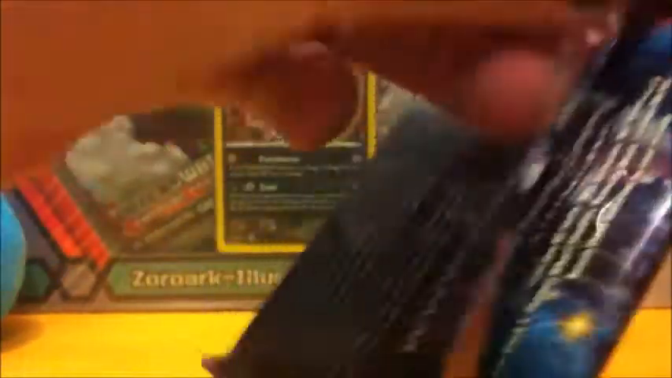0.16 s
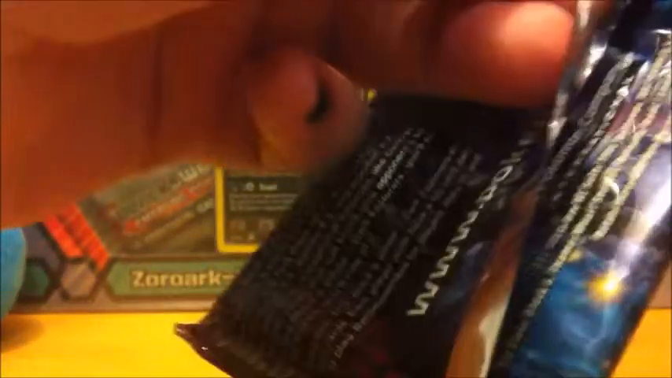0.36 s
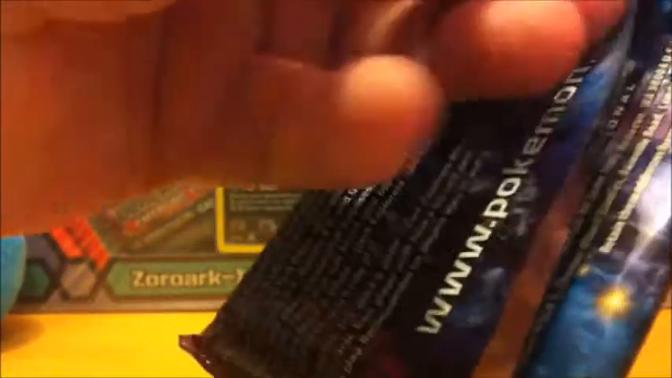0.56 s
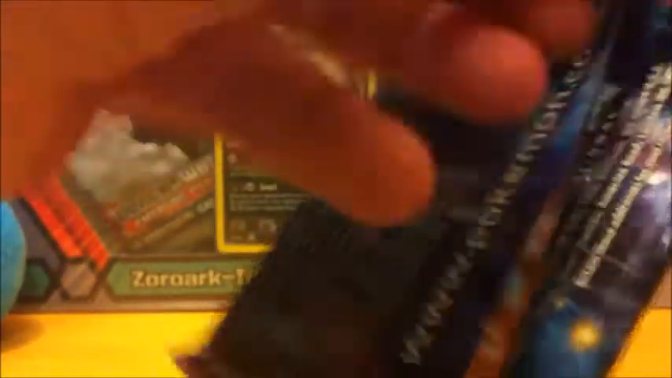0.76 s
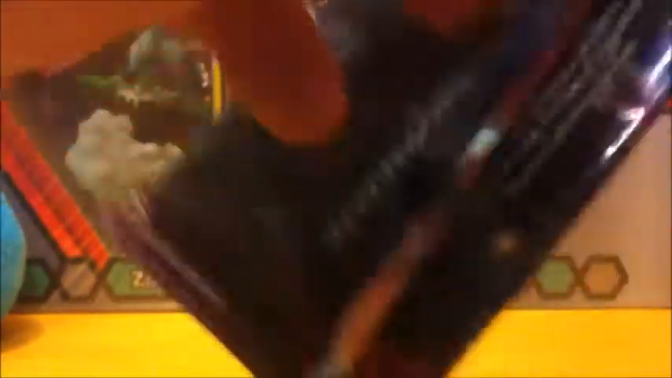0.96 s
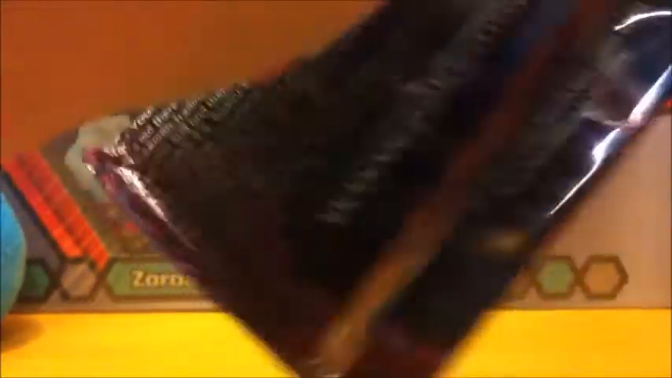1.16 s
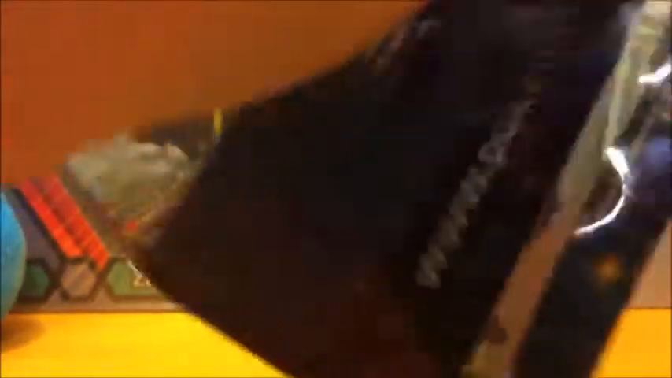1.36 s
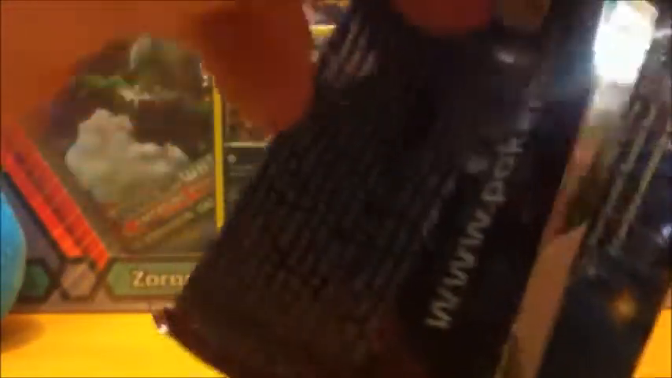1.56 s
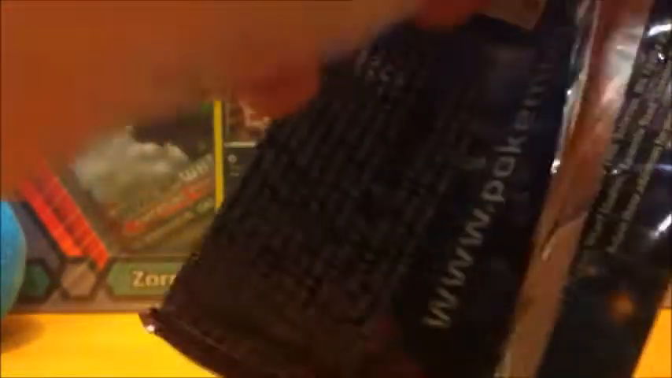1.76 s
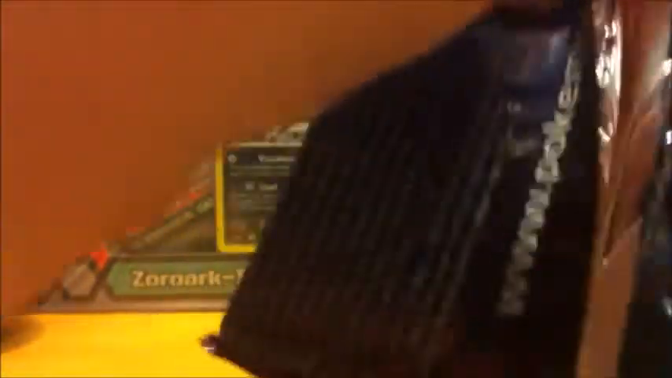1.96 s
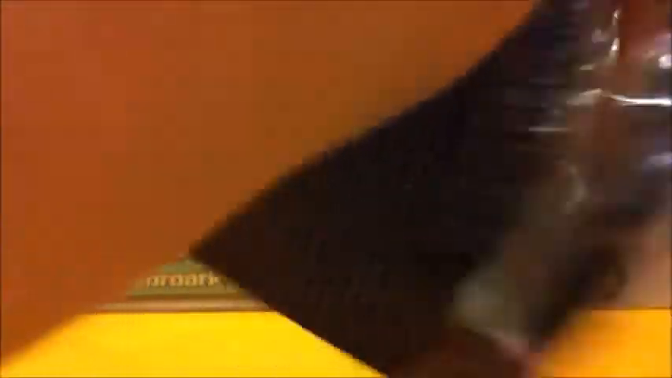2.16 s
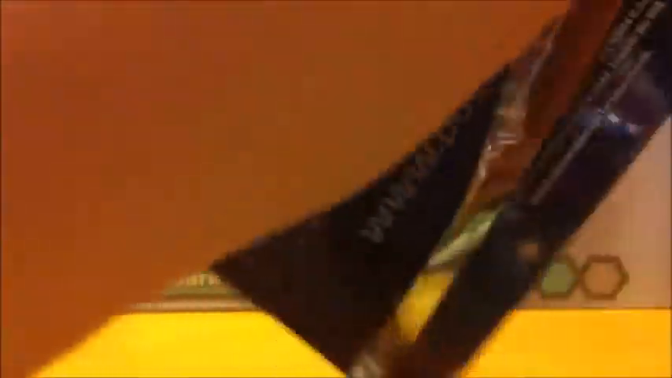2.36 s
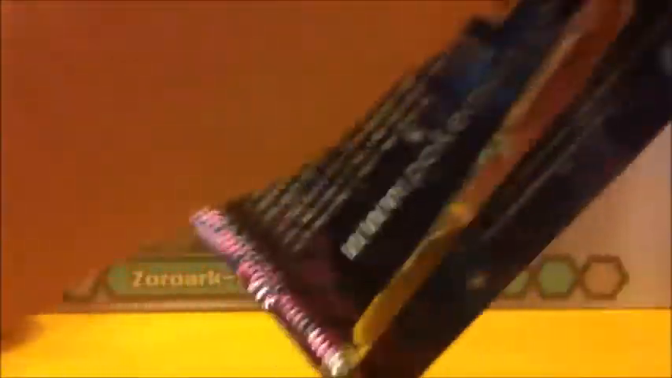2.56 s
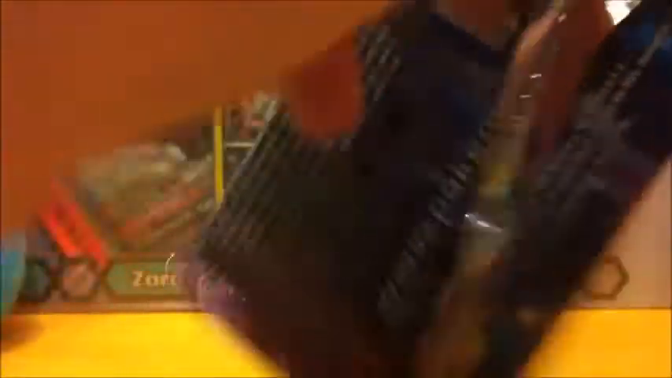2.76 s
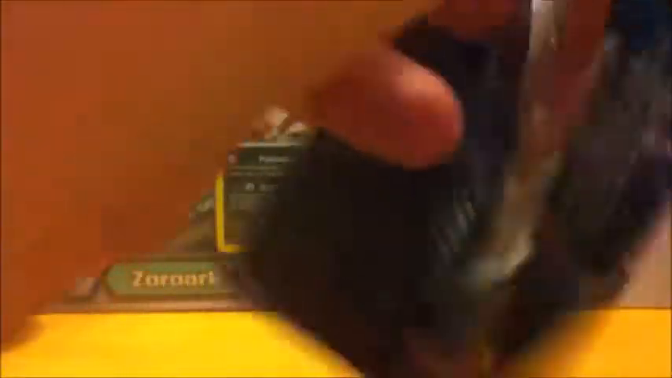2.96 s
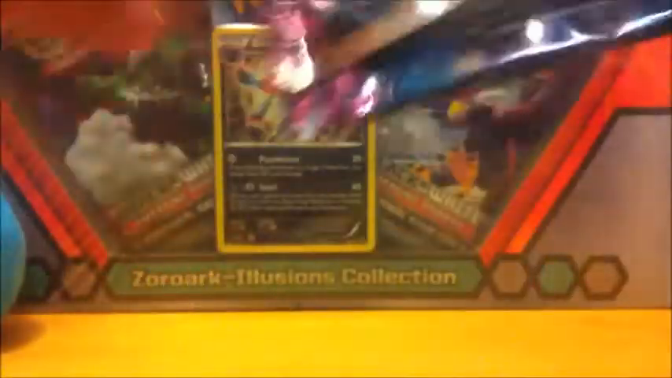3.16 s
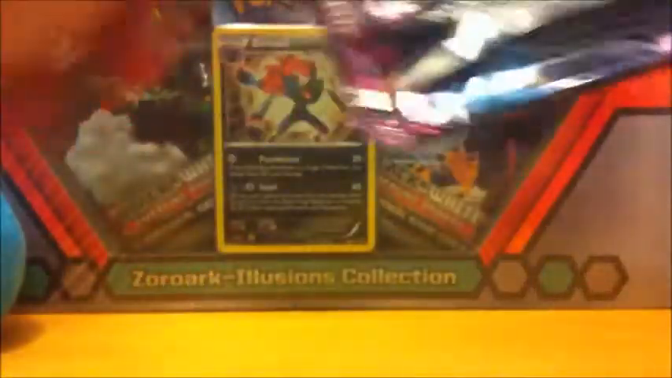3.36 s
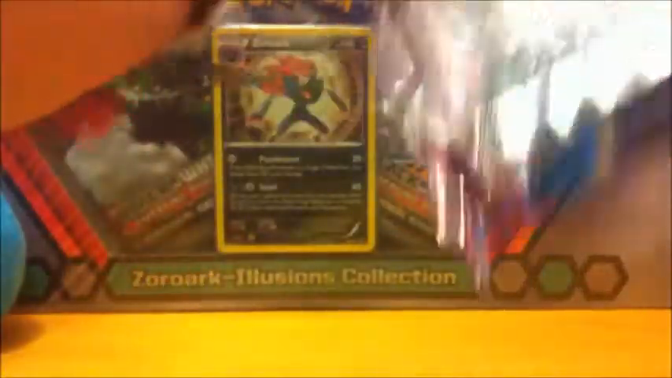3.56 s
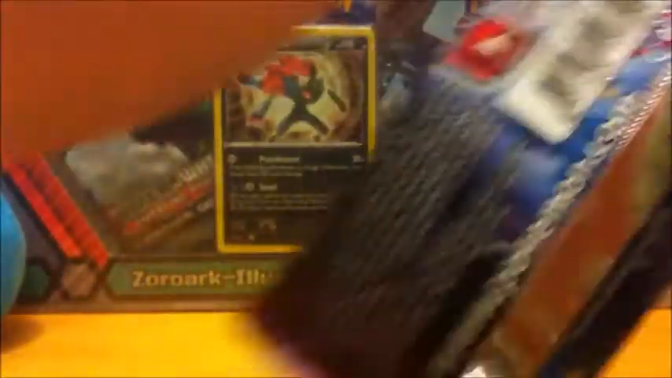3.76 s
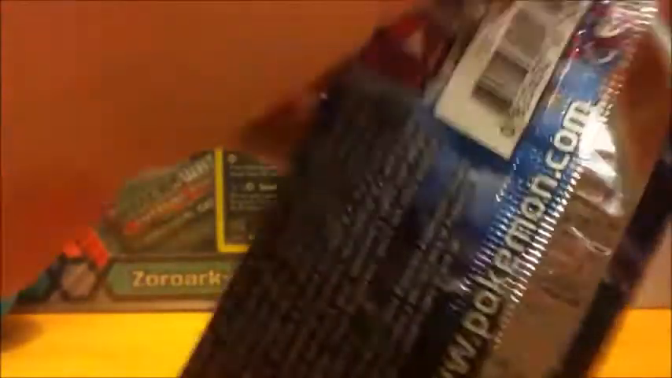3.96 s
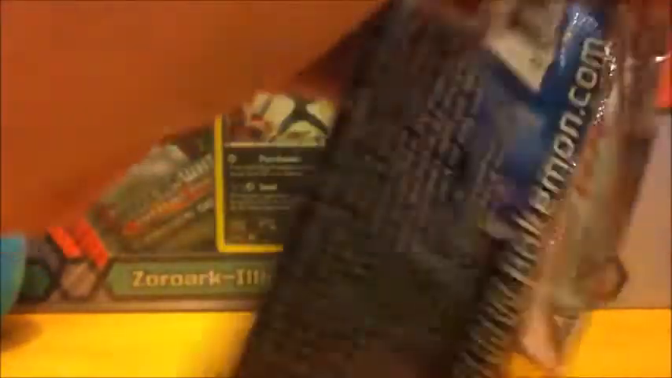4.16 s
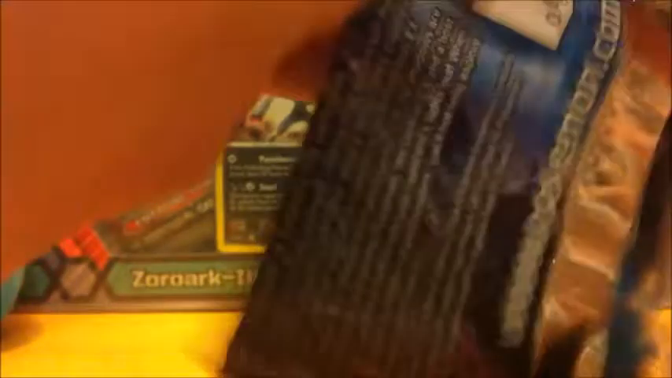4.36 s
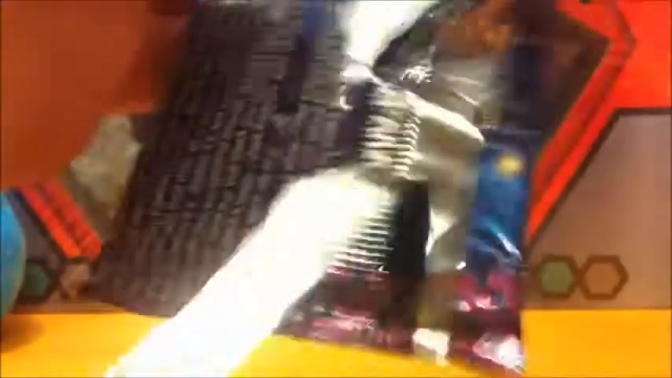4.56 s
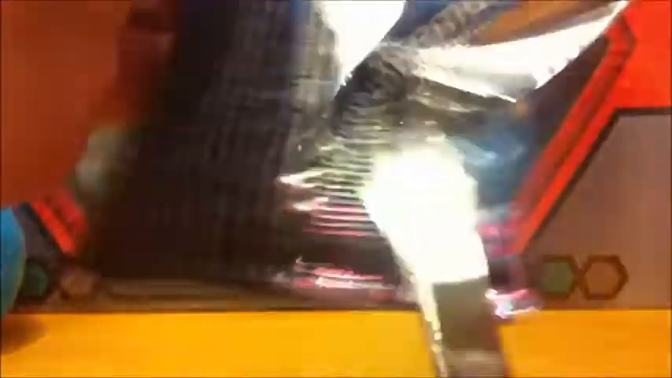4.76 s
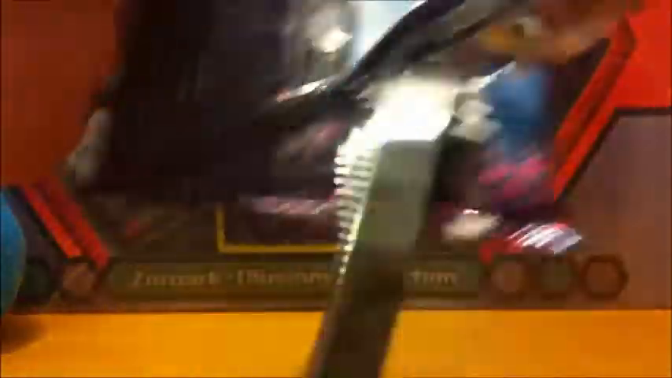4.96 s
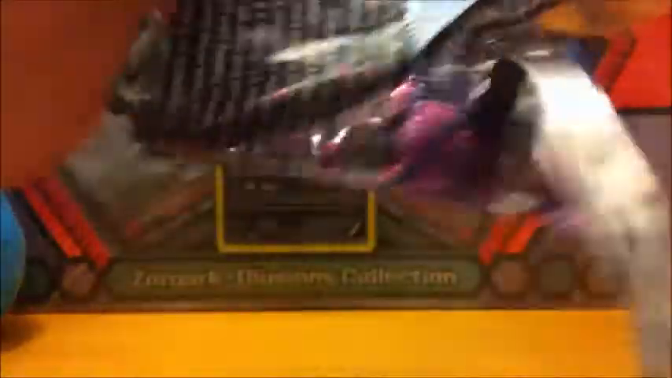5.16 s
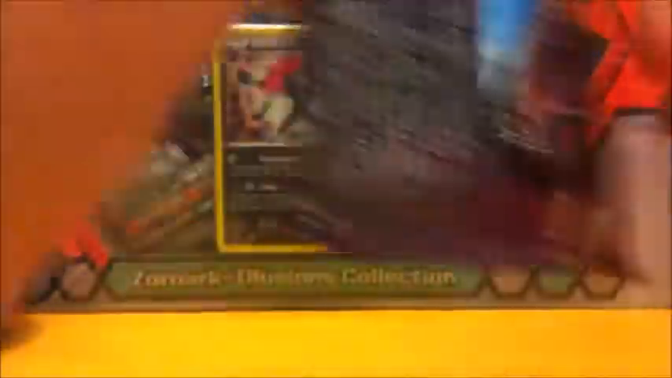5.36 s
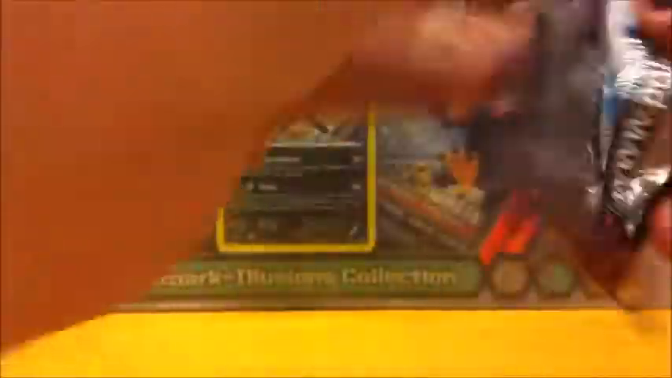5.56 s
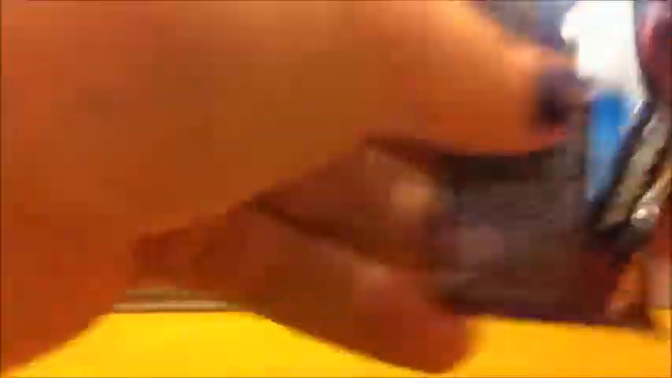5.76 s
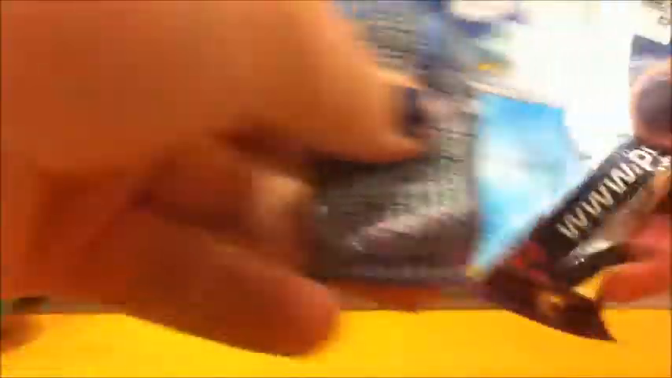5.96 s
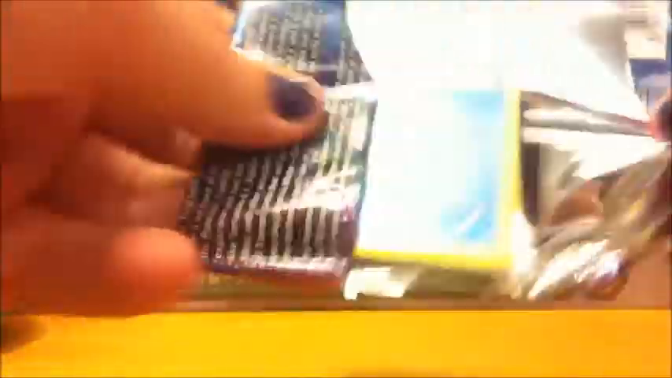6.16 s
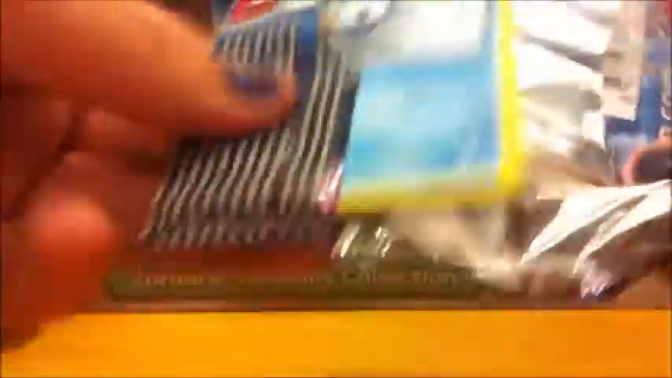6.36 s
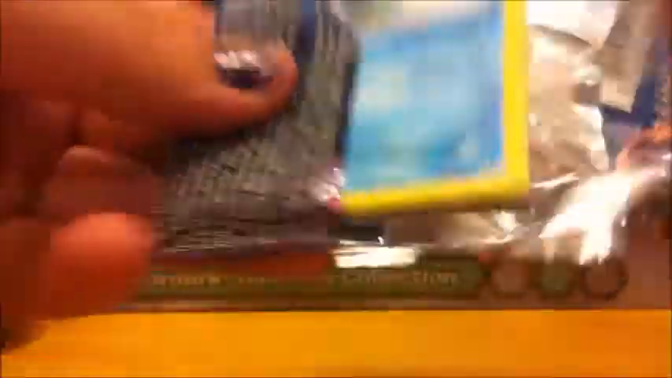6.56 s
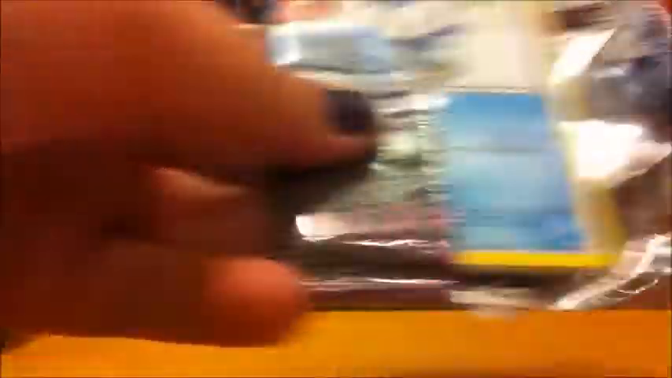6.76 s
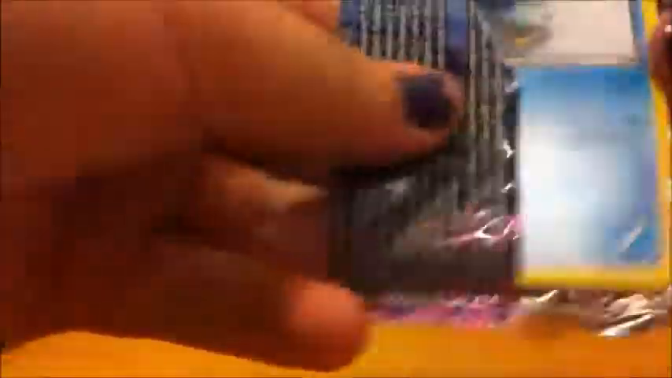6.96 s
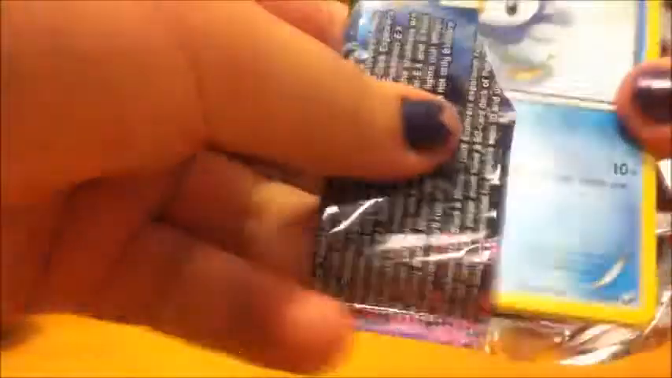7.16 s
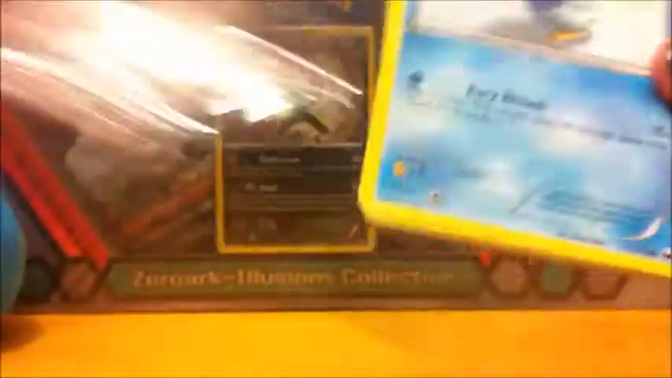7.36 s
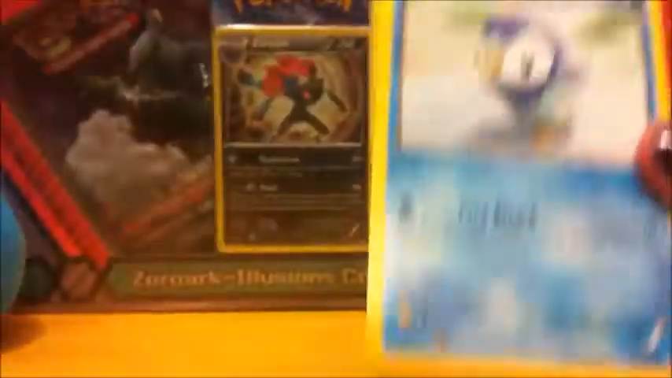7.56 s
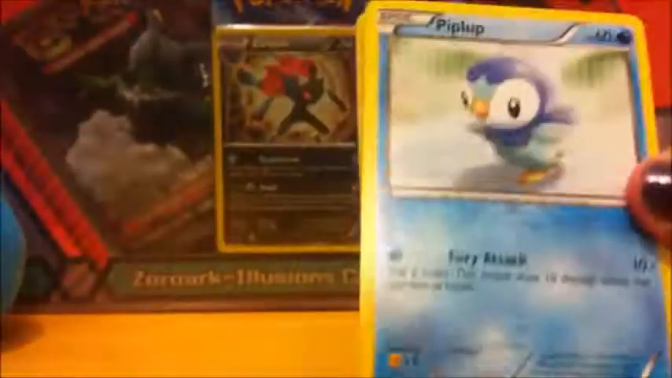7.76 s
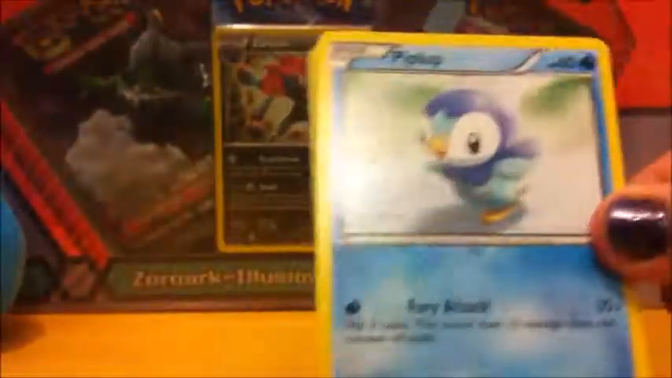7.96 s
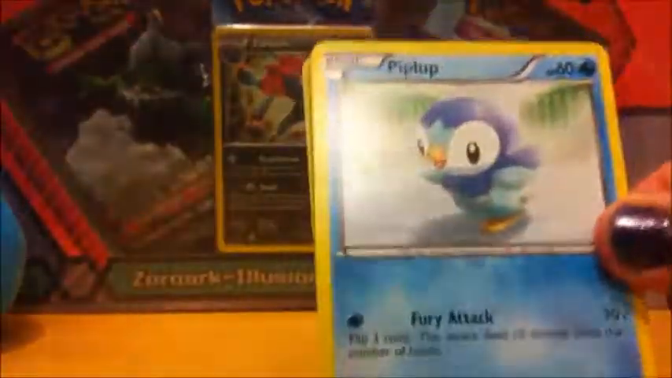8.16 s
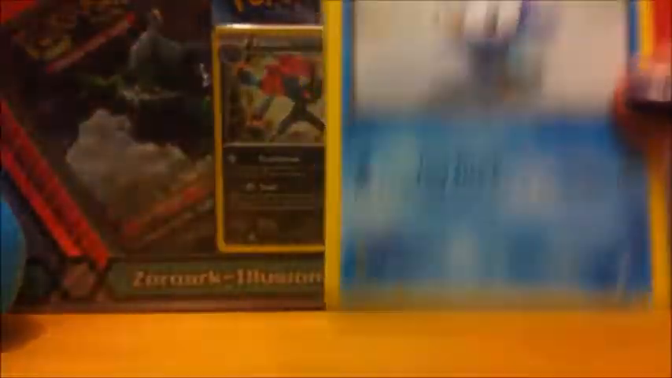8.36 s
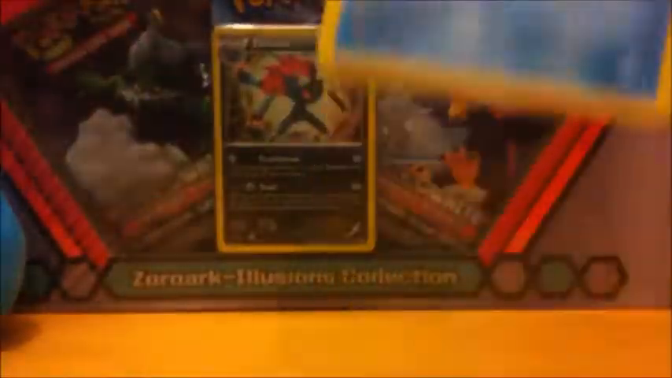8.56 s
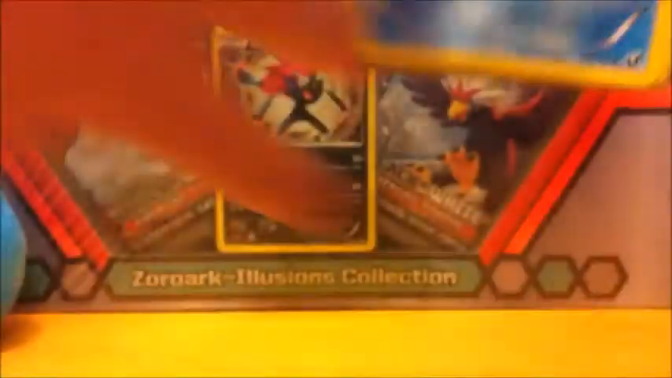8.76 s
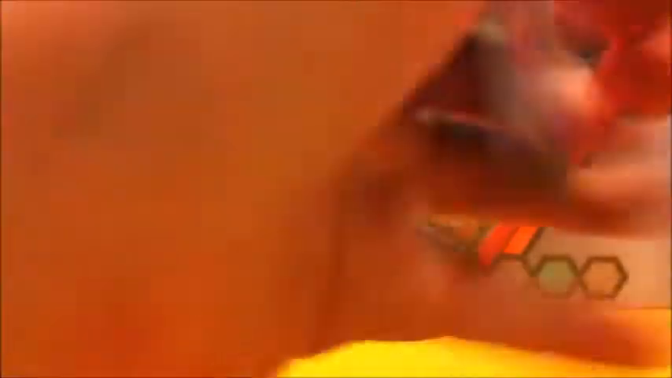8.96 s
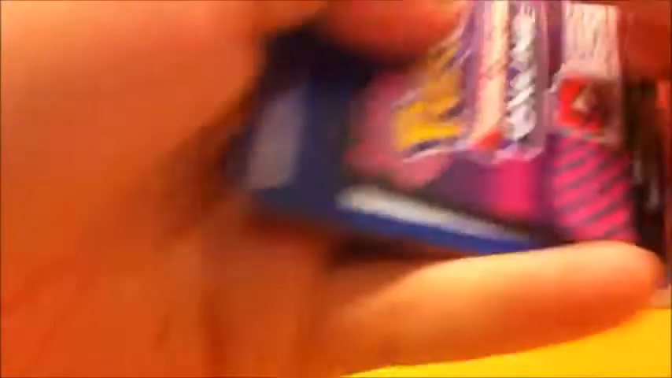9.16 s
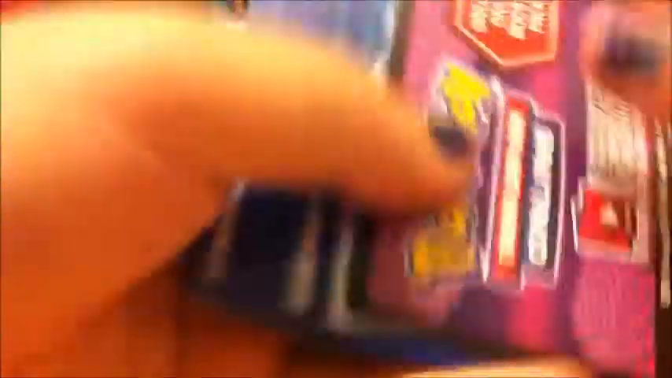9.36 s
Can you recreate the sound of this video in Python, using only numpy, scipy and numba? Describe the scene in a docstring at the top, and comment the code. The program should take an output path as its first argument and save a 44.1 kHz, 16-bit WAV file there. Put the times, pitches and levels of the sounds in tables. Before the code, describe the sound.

Very close to the microphone in a small, dry room, fingers work a stiff foil packet. Sparse crinkles grow into sharp, bright snaps and dense crackling bursts. Short ribbed rips tear the seal, the loosened foil rustles vigorously, then thin cards slide out with papery scrapes and light taps. The end is nearly silent, with quiet hiss.

```python
"""Foil card pack opened close to the microphone

Hands crinkle a foil card pack, tear it open and slide the cards out over a table in a small room.
Large creases are sharp bursts ringing stiff patches of foil, the hollow pack and a bright sizzle on top.
Random swarms of tiny creases crackle between them; the tear ticks over ribs; fingers and cards knock softly.
Decaying noise gives the room's answer, with quiet hiss and a faint low moan of wavering tone and haze behind."""
import sys
import numpy as np
from scipy import signal
from scipy.fft import rfft, irfft
from scipy.io import wavfile
from scipy.ndimage import uniform_filter1d
from numba import njit

SR = 44100
rng = np.random.default_rng(int(sys.argv[2]) if len(sys.argv) > 2 else 0)


def output_pcm(signal):
    """Save a mono or channel-first signal as 16-bit PCM at the path in sys.argv[1].

    Samples are clipped to [-1, 1] before scaling.
    """
    pcm = np.clip(np.atleast_2d(signal).T, -1, 1) * 32767
    wavfile.write(sys.argv[1], SR, np.round(pcm).astype(np.int16))


N = 415245

# top of the pack body, foot of the sizzle, top of what the microphone passes
BODY_TOP_HZ, SIZZLE_HZ, TOP_HZ = 1500, 8000, 16000
SNAP_S = .004  # time over which the level of a snap is reckoned
SHEET_HZ, SHEET_WIDTH_HZ = 1150, 970  # the sheet around a snapping crease, damped by the fingers: a dry crack
SWELL_DB, SWELL_S = -21, 0.0016  # a faint noise swells before each snap, with this time constant
EDGE_ECHO, EDGE_ECHO_S = .55, (.0004, .0014)  # gain and range of delays of the wave back from the pack's edge
PUFF_HZ, PUFF_DB = 124, -14  # puff of air in the pack
GRIP_WANDER = .09  # spread of the pack's pitch, as a natural logarithm

RIB_S, RIB_HZ = 0.003, 2690  # time from rib to rib, pitch of the facet
RIB_BODY_DB, RIB_SIZZLE_DB = -4, -12  # re the facet
RIB_JITTER, RIB_SCATTER_DB, RIB_FLUTTER_S = .12, 1.5, .0012  # jitter as a share of RIB_S
STRAY_PER_S, STRAY_DB, STRAY_SPREAD_DB, STRAY_UNTIL_S = 13, -52.5, 3.5, 8.3

# how fast a movement sets in and dies away
FLEX_RISE_DB_PER_S, FLEX_FALL_DB_PER_S = 1302, 652
SLIDE_RISE_DB_PER_S, SLIDE_FALL_DB_PER_S = 479, 408
GENTLE_POPS_PER_S, HARD_POPS_PER_S = 75, 800  # tiny creases under a light touch and in a hard crush
GENTLE_RUB_DB, HARD_RUB_DB = -17.5, 1  # rub of skin re the pops, likewise
SWARM_DAMPING, FACET_WANDER = 0.33, .12  # width re pitch; spread of pitch as a natural logarithm
POP_FLUTTER_S, CLUSTER_DB = 0.0013, 3

RUMBLE_HZ, RUMBLE_WIDTH_HZ = 195, 59
HISS_DB = -64
MOAN_HZ, MOAN_RISE_HZ, MOAN_LAG_S = 325, 53.6, 0.095  # resting pitch, its rise, lag of the pitch
MOAN_HAZE_DB, MOAN_WIDTH_HZ = -3, 14  # haze re the tone; cutoff of the waver


def snaps(creases, flutter_s=0.003):
    """Each crease buckles, rings its own facet and shakes the pack with a colour of its own."""
    out = np.zeros(N)
    before = np.arange(-SR // 100, 0) / SR
    shifts = rng.standard_normal(len(creases))
    for (s, db, hz, body, top), shift in zip(creases, shifts):
        swell = rng.standard_normal(len(before)) * np.exp(before / SWELL_S) * undb(SWELL_DB)
        # a fold that moves the whole pack gives way more slowly
        push = np.append(swell, buckle(flutter_s * undb(body / 4)))
        # a snap with little sizzle rings more purely
        damping = np.interp(top, [-20, 0], [.35, .75])
        shake = rebound(push)
        taut = grip(s) * np.exp(GRIP_WANDER * shift)
        thud = pack(shake, taut) + resonate(shake, SHEET_HZ, SHEET_WIDTH_HZ)
        # a crease that barely shakes the pack stirs only its upper modes
        thud = butter(thud, 200 * undb(-body / 3), "high", order=1)
        parts = (facet(push, hz, damping), 0), (thud, body), (sizzle(push), top)
        snap = sum(part * undb(db + rel) / np.linalg.norm(part) for part, rel in parts)
        add(out, s + before[0], snap * np.sqrt(SNAP_S * SR))
    return out


def buckle(flutter_s, jump=4.25, shiver_db=-19):
    """A sudden jump, then bending waves that run about the sheet and die."""
    t = np.arange(SR // 25) / SR
    flutter = np.exp(-t / flutter_s)
    shiver = np.exp(-t / SNAP_S)
    push = rng.standard_normal(len(t)) * (flutter + undb(shiver_db) * shiver)
    push[0] += jump
    return push


def facet(push, hz, damping):
    """A small stiff patch of foil rings for a few cycles."""
    ring = resonate(push, hz, np.minimum(damping * hz, SIZZLE_HZ))
    return butter(butter(ring, BODY_TOP_HZ, "high"), SIZZLE_HZ, "low", order=3)


def sizzle(push):
    """The sharp top of a buckling crease."""
    return butter(push, SIZZLE_HZ, "high", order=4)


def pack(push, taut):
    """The low resonances of the hollow pack, driven by its skin, and a puff of air; the grip shifts them."""
    # modes of the pack in the hands: (f/Hz before the grip's factor, width/Hz, relative level/dB)
    body_modes = [(166, 173, -9), (310, 110, -2), (745, 152, 5), (893, 340, -0.5), (1960, 300, 3.5)]
    body = 0
    for k, (hz, width, db) in enumerate(body_modes):
        body = body + (-1) ** k * undb(db) * resonate(push, hz * taut, width)
    return butter(body, BODY_TOP_HZ, "low") + undb(PUFF_DB) * butter(push, PUFF_HZ, "low")


def grip(s):
    """How taut the pack is at time s: a factor on the pitch of its resonances."""
    # the hands tighten or slacken the pack, loose once torn: (t/s, pitch factor re the loose pack)
    tautness = [(2.1, 1.09), (3.09, 1.18), (3.2, 1.21), (4.9, 1.06), (5.4, 1.02)]
    return np.interp(s, *np.transpose(tautness))


def rebound(push):
    """The bending wave returns from the edge of the pack, either way up, after a random short delay."""
    delay = int(rng.uniform(*EDGE_ECHO_S) * SR)
    return push + rng.choice([-1, 1]) * EDGE_ECHO * np.roll(push, delay)


def ribs():
    """The tear catches on rib after rib, almost evenly: rows like those of the large creases."""
    # the tear runs through the crimped seal: (start t/s, end t/s, level of a tick/dB before scatter)
    tears = [(4.9907, 5.025, -39.5), (5.0755, 5.086, -35.5), (5.15, 5.182, -35.5), (5.365, 5.384, -36.5)]
    ticks = [(s, db) for start, end, db in tears for s in np.arange(start, end, RIB_S)]
    draws = rng.standard_normal((len(ticks), 2))
    return [(s + RIB_JITTER * RIB_S * late, db + RIB_SCATTER_DB * size, RIB_HZ, RIB_BODY_DB, RIB_SIZZLE_DB)
            for (s, db), (late, size) in zip(ticks, draws)]


def strays(hz=4000, body_db=-9, top_db=-6):
    """Small creases let go by themselves at random moments: rows like those of the large creases."""
    count = int(STRAY_PER_S * STRAY_UNTIL_S)
    times = rng.uniform(0, STRAY_UNTIL_S, count)
    rows = []
    for s, (size, pitch) in zip(times, rng.standard_normal((count, 2))):
        level = STRAY_DB + STRAY_SPREAD_DB * size
        tone = hz * 2 ** np.clip(pitch / 2, -1, .5)
        rows.append((s, level, tone, body_db - STRAY_SPREAD_DB * pitch, top_db))
    return rows


def rustle(slide_db=-5, drag_db=-5):
    """Tiny creases pop at random, faster as the foil is worked harder, over the rub of skin and card."""
    # fingers flex, crumple or tear the foil:
    # (start t/s, end t/s, facet level/dB, pack body re facets/dB, sizzle re facets/dB)
    flexes = [(0.01, 0.13, -53.5, -4.5, -17), (0.415, 0.445, -53, -35, 4), (2.283, 2.33, -56, -0.5, -11),
              (2.56, 2.63, -45.5, -16, -17), (2.82, 2.93, -60, -3, -4), (2.96, 3.045, -39, -7.5, 0.5),
              (3.05, 3.078, -31, -14, -12), (3.08, 3.135, -24.5, -9.5, -1), (3.14, 3.245, -35, -2, -1.5),
              (3.62, 3.97, -66, -2, 5), (4.02, 4.21, -52.5, 1.5, -2), (4.455, 4.7, -39, -6, -10.5),
              (4.475, 4.548, -30, -15.5, -2), (4.795, 4.825, -43, 0, -13), (4.885, 4.93, -39, 1.5, 5.5),
              (5.26, 5.5, -53.5, 0, -2), (5.495, 5.655, -46, -4, -4.5), (5.7, 5.88, -54, 0.5, -7),
              (5.94, 6.02, -41, -5.5, -4.5), (6.03, 6.055, -33.5, -5.5, -1), (6.165, 6.19, -34.5, -5, -3.5),
              (6.2, 6.245, -27.5, 0.5, 3.5), (6.335, 6.48, -43.5, -4, 1), (6.52, 6.59, -59.5, 6.5, -16),
              (6.665, 6.755, -47, -2, 1), (6.935, 6.995, -46.5, 3.5, -5), (7.13, 7.145, -51, 3, -17),
              (7.03, 7.7, -68, 0, 3.5)]
    # the foil or a card slides smoothly:
    # (start t/s, end t/s, facet level/dB, pack body re facets/dB, sizzle re facets/dB)
    slides = [(1.67, 1.75, -50, -22, 12), (3.49, 3.54, -47.5, -2.5, -3.5), (4.71, 4.733, -35, -14, 0),
              (7.31, 7.37, -54.5, -7, 9.5), (7.38, 7.495, -47.5, 1, -1.5), (7.745, 7.93, -61, -0.5, 1.5),
              (7.785, 7.805, -56.5, 0, 7), (8.325, 8.35, -53.5, -8, -0.5), (8.67, 8.76, -67, -4.5, 0),
              (9.052, 9.085, -59.5, -5, -10.5)]
    flexing = movements(flexes, FLEX_RISE_DB_PER_S, FLEX_FALL_DB_PER_S)
    sliding = movements(slides, SLIDE_RISE_DB_PER_S, SLIDE_FALL_DB_PER_S)
    power = flexing + sliding + 1e-12
    effort = np.interp(10 * np.log10(power[0]), [-55, -25], [0, 1])

    even_rate = GENTLE_POPS_PER_S * (HARD_POPS_PER_S / GENTLE_POPS_PER_S) ** effort
    giving = CLUSTER_DB * fits()
    rate = even_rate * undb(giving)  # pops come in clusters
    skin_rub = undb(np.interp(effort, [0, 1], [GENTLE_RUB_DB, HARD_RUB_DB]) + giving / 2)
    slide_rub = undb(slide_db + giving / 2) * sliding[0] / power[0]
    rub = skin_rub + slide_rub

    pitches = np.geomspace(2000, 6600, num=7)
    rings, thuds, edges = 0, 0, 0
    for hz in pitches:
        pops = rng.random(N) < rate / SR / len(pitches)
        size = undb(6 * np.minimum(rng.exponential(size=N), 3)) * rng.choice([-1, 1], N)
        strikes = pops * size / np.sqrt(even_rate)  # frequent pops are each weaker
        crackle = signal.oaconvolve(strikes, buckle(POP_FLUTTER_S))[:N]
        push = unit(crackle) + rub * rng.standard_normal(N)
        # no two facets are the same size
        rings = rings + facet(push, hz * np.exp(FACET_WANDER * fits()), SWARM_DAMPING)
        # wide, low facets shake the pack; small, high ones sizzle
        thuds = thuds + push / hz
        edges = edges + push * hz ** 2
    taut = grip(np.arange(N) / SR) * np.exp(GRIP_WANDER / 2 * fits(size=1500))
    parts = rings, unit(pack(thuds, taut)), sizzle(edges)
    swarm = sum(steady(part) * np.sqrt(p) for part, p in zip(parts, power))

    # sliding foil and cards scrape with a low, papery rumble
    drag = butter(resonate(rng.standard_normal(N), 293, 160), 630, "low")
    drag = butter(drag, PUFF_HZ, "high")
    return swarm + unit(drag) * np.sqrt(sliding[1]) * undb(drag_db)


def movements(table, rise, fall):
    """Each movement swells, holds and dies away: power over time of facets, pack body and sizzle."""
    t, power = np.arange(N) / SR, np.zeros((3, N))
    for start, end, db, body, top in table:
        near = slice(int(max(start - .5, 0) * SR), int((end + .5) * SR))
        early = np.maximum(start - t[near], 0)
        late = np.maximum(t[near] - end, 0)
        shape = undb(-rise * early - fall * late)
        power[:, near] += np.outer(undb([db, db + body, db + top]), shape) ** 2
    return power


def fits(size=520):
    """Foil gives way in fits and starts: a new random level every size samples, slewed, spread 1."""
    levels = np.repeat(rng.standard_normal(N // size + 1), size)
    return unit(uniform_filter1d(levels, size // 3)[:N])


def knocks(damping=0.95, tick_db=-3):
    """Soft contacts sound briefly in the stack of cards, each begun by the dry tick of an edge."""
    # fingers on the pack and cards on each other: (t/s, peak level of the thud/dB, f/Hz)
    contacts = [(0.665, -28, 1110), (1.831, -41, 269), (3.229, -27.5, 450), (3.525, -41, 730),
                (4.198, -36, 150), (4.263, -34.5, 238), (5.364, -24.5, 320), (5.762, -42.5, 670),
                (7.537, -43, 900), (7.57, -49, 1493), (7.745, -50, 227), (7.914, -48, 325),
                (7.958, -49, 1187), (8.04, -53.5, 1010), (8.116, -56, 1120), (8.183, -48, 956),
                (8.249, -55, 1076), (8.483, -57.5, 597), (8.535, -52.5, 790), (8.659, -42.5, 1750),
                (8.796, -44.5, 2530), (9.075, -45, 238), (9.365, -50.5, 895), (9.391, -47, 1500)]
    out, t = np.zeros(N), np.arange(SR // 10) / SR
    fade = np.exp(-t / .011)
    for s, db, hz in contacts:
        thud = resonate(rng.standard_normal(len(t)) * fade, hz, damping * hz)
        thud = butter(butter(thud, 2 * hz, "low"), hz / 2, "high")
        tick = resonate(buckle(POP_FLUTTER_S), 2 * hz, 2 * hz)
        add(out, s, thud / np.abs(thud).max() * undb(db))
        add(out, s, tick / np.abs(tick).max() * undb(db + tick_db))
    return out


def rumbles():
    """The heel of a hand drags on the pack: a dull, low flutter."""
    # a hand shifts on the pack: (start t/s, end t/s, level/dB)
    shifts = [(3.23, 3.265, -48.5), (3.365, 3.39, -56), (3.467, 3.51, -51.5), (7.88, 7.92, -64)]
    t, press = np.arange(N) / SR, np.zeros(N)
    for start, end, db in shifts:
        rise = FLEX_RISE_DB_PER_S * np.maximum(start - t, 0)
        fall = FLEX_FALL_DB_PER_S * np.maximum(t - end, 0)
        press += undb(db - rise - fall)
    flutter = resonate(rng.standard_normal(N), RUMBLE_HZ, RUMBLE_WIDTH_HZ)
    flutter = butter(flutter, 2 * RUMBLE_HZ, "low")
    return steady(butter(flutter, RUMBLE_HZ / 2, "high")) * press


def room(x, early_s=0.011, early_db=-17, late_db=-30.0):
    """Quick reflections from table and hands, then the short tail of the room, as decaying noise."""
    t = np.arange(SR // 2) / SR
    t60 = .24  # seconds for the tail to fall by 60 dB
    early = rng.standard_normal(len(t)) * np.exp(-t / early_s) * (t > SNAP_S)
    late = butter(rng.standard_normal(len(t)), SIZZLE_HZ, "low") * undb(-60 * t / t60) * (t > 2 * SNAP_S)
    response = undb(early_db) * early / np.linalg.norm(early) + undb(late_db) * late / np.linalg.norm(late)
    return signal.oaconvolve(x, response)[:N]


def hiss():
    """Steady noise, coloured like the quiet of the room."""
    # shape of the room's noise: (f/Hz, relative level/dB per Hz)
    quiet = [(30, -19), (90, -12), (170, -1), (320, 1), (520, -4), (1000, -4), (5000, -8), (15500, -10.5)]
    hz, db = np.transpose(quiet)
    bins = np.maximum(np.fft.rfftfreq(N, 1 / SR), 1)
    colour = undb(np.interp(np.log(bins), np.log(hz), db))
    return unit(irfft(rfft(rng.standard_normal(N)) * colour, N)) * undb(HISS_DB)


def moan():
    """A narrow band of noise whose pitch follows its swell a little late, under a soft haze."""
    # faint low swells: (peak t/s, time from the peak to 1/e/s, level of the tone at the peak/dB)
    swells = [(0.588, 0.23, -61.5), (3.741, 0.24, -65), (6.309, 0.83, -61.5)]
    t = np.arange(N) / SR

    def swell(lag):
        """The sum of the swells, delayed by lag seconds."""
        return sum(undb(db) * np.exp(-((t - lag - s) / half) ** 2) for s, half, db in swells)

    late = swell(MOAN_LAG_S)
    phase = 2 * np.pi * np.cumsum(MOAN_HZ + MOAN_RISE_HZ * late / late.max()) / SR
    waver = butter(rng.standard_normal(N) + 1j * rng.standard_normal(N), MOAN_WIDTH_HZ, "low")
    tone = unit((waver * np.exp(1j * phase)).real)
    haze = unit(butter(resonate(rng.standard_normal(N), 480, 500), 1100, "low", order=4))
    return (tone + undb(MOAN_HAZE_DB) * haze) * swell(0)


def undb(db):
    """Decibels to gain."""
    return 10 ** (np.asarray(db) / 20)


def unit(x):
    """Scale to rms 1."""
    return x / np.sqrt(np.mean(x ** 2))


def steady(x, size=1100):
    """Even out the power over a few hundredths of a second, keeping the single pops."""
    power = uniform_filter1d(uniform_filter1d(x ** 2, size), size)
    return x / np.sqrt(np.abs(power) + 1e-12)


def add(track, s, sound):
    """Mix a sound in at time s."""
    i = int(np.clip(s * SR, 0, N - 1))
    track[i:i + len(sound)] += sound[:N - i]


def butter(x, hz, kind, order=2):
    """Low- or high-pass."""
    return signal.lfilter(*signal.butter(order, min(hz, .45 * SR), kind, fs=SR), x)


def resonate(x, hz, width):
    """One resonance, still or moving, gain 1 at its centre."""
    ones = np.ones(len(x))
    return band(x, np.tan(np.pi * hz / SR) * ones, width / hz * ones)


@njit
def band(x, g, k):
    """State-variable band-pass whose tuning g and damping k may move every sample."""
    y, b, l = np.empty(len(x)), 0., 0.
    for i in range(len(x)):
        v = (b + g[i] * (x[i] + 1e-18 - l)) / (1 + g[i] * (g[i] + k[i]))
        b, l, y[i] = 2 * v - b, l + 2 * g[i] * v, k[i] * v
    return y


def scene():
    """The pack in the hands, its room and the background."""
    # the big creases that buckle: (t/s, level of the ringing facet over SNAP_S/dB, f/Hz of the facet,
    # pack body re facet/dB, sizzle re facet/dB)
    big_creases = [(0.057, -46, 3900, -10, -8), (0.097, -36.5, 2400, -52, -17),
                   (0.1182, -22, 5350, -11, -14), (0.1276, -32, 3510, -1.5, -32),
                   (0.2, -55.5, 3990, -4, -12), (0.4241, -39.5, 5250, -11, -4), (0.499, -55, 4900, 2, -23),
                   (0.6661, -26, 4970, -6, 0), (0.813, -47, 6000, -7, -3), (0.864, -40.5, 3650, -10.5, -12),
                   (0.9055, -48, 4500, -17, -17), (0.955, -39.5, 4520, -3.5, -1),
                   (1.012, -38.5, 3720, -7, -7), (1.1892, -27, 4396, -8.5, -5),
                   (1.2748, -35, 7000, -25, 6.5), (1.3588, -37, 6550, -12.5, 4),
                   (1.3957, -28.5, 5200, -36, -19), (1.4923, -22.5, 2240, -14, 5),
                   (1.498, -30.5, 6640, -14, 7), (1.614, -37, 3470, -9, 1.5), (1.69, -36.5, 4777, -15, -9),
                   (1.784, -45.5, 5400, -16, 7), (1.833, -23.5, 6260, -19, 7), (1.838, -17, 6060, -26, -1),
                   (1.846, -24.5, 3730, -36, -5), (1.878, -33.5, 7400, -28, -11),
                   (1.9392, -16.5, 6730, -33, -3.5), (1.9667, -19, 4060, -27, -1.5),
                   (2.0035, -25.5, 4800, -26, 4.5), (2.0356, -33.5, 4400, -3, -3),
                   (2.0646, -14, 4340, -54, -27), (2.1088, -21, 4330, -5.5, -6),
                   (2.215, -36.5, 4500, -8.5, -8), (2.253, -43.5, 4500, -1.5, 3),
                   (2.2937, -35.5, 4070, -17, -8), (2.3374, -29.5, 4300, -16.5, 4.5),
                   (2.4761, -27.5, 4760, -20.5, -2), (2.5455, -35.5, 4930, -3, -5),
                   (2.5733, -25, 3940, -23, 0), (2.6258, -28, 6440, -9, -6), (2.663, -36.5, 4180, -12, -11),
                   (2.7626, -32, 4770, -11.5, 1.5), (2.7763, -26, 5000, -19, -23),
                   (2.7926, -31, 5260, -9.5, -4), (2.9662, -31, 3360, -9, -10),
                   (2.9714, -26.5, 3670, -5, -25), (3.0137, -21, 4040, -25, -10),
                   (3.0794, -17, 4700, -27, -24), (3.1115, -14.5, 4300, -12.5, -11),
                   (3.1324, -18, 3910, -7, -15), (3.1565, -18.5, 4420, -14, -10),
                   (3.4749, -36, 5470, -12, -9), (3.502, -34, 6400, -9.5, 1), (3.673, -41, 4830, -7, 2),
                   (3.7397, -46.5, 2040, 7.5, -19), (4.013, -29.5, 6560, -4, -3),
                   (4.0888, -42, 4320, -8, 0), (4.1734, -28.5, 5970, -31, -3.5),
                   (4.1974, -18.5, 4250, -8, -8), (4.2112, -18, 4700, -7, -9),
                   (4.266, -35.5, 4220, -3.5, 3), (4.3325, -30.5, 4800, -7, -8),
                   (4.3618, -32.5, 4260, -12.5, -16), (4.404, -28, 3750, -1.5, -8),
                   (4.4095, -26, 4470, -11.5, -1), (4.4267, -21.5, 3730, -34, -5),
                   (4.437, -31, 4500, -7, -1), (4.467, -21, 4670, -5, 5.5), (4.4785, -15, 4500, -17, -29),
                   (4.4887, -21, 4740, -31, 3), (4.497, -23, 3390, -24, -9), (4.5168, -21, 6700, -10.5, 1),
                   (4.531, -22, 4430, -5, -4), (4.5632, -29, 4300, -1, -8), (4.5725, -27, 3570, -32, -12),
                   (4.5914, -24, 4030, -36, -6), (4.6343, -27, 4460, -31, -13),
                   (4.6454, -23.5, 3260, -23, 0.5), (4.6849, -24.5, 4800, -1, -22),
                   (4.789, -28.5, 4870, -4, -26), (4.8003, -27.5, 3200, 3, 0), (4.8796, -34, 5700, -5, -6),
                   (4.8936, -22, 3760, -1.5, -23), (4.9224, -22.5, 4600, 0, -27),
                   (4.9987, -26.5, 5400, 1.5, -1), (5.0312, -41.5, 3300, 4, -27),
                   (5.1346, -29.5, 3060, -2, -4), (5.17, -29, 3000, -11, -3.5),
                   (5.1903, -33.5, 3300, -8, -9), (5.2307, -40.5, 3670, -8, -22),
                   (5.2493, -23, 4130, -18, -8.5), (5.3625, -23.5, 4100, -6, -21),
                   (5.3665, -20, 3750, -9, -10.5), (5.397, -28.5, 3820, -22, 2.5),
                   (5.5557, -36.5, 4870, -3, -10), (5.598, -34.5, 4390, -4, -2),
                   (5.634, -25.5, 4460, -6.5, -6), (5.646, -37.5, 2100, 7, 6),
                   (5.7439, -33.5, 3780, -6, -9), (5.8057, -33.5, 3600, -15, -8), (5.869, -39, 4060, 1, -2),
                   (5.892, -29.5, 7600, -8.5, 3), (5.9144, -30.5, 5940, -6.5, 3),
                   (5.9314, -24.5, 7900, -11, 4), (5.9489, -34.5, 5720, -5, 7), (5.9922, -36, 4700, -2, 2),
                   (6.0322, -22.5, 5000, -4, 1.5), (6.063, -52, 5200, -16, -2),
                   (6.1242, -22.5, 5800, -9, -13), (6.1422, -26.5, 5560, -3, -7),
                   (6.1696, -18.5, 6340, -3.5, -3), (6.1972, -24, 5150, -2, 0), (6.2157, -19, 6700, -7, -2),
                   (6.2245, -16, 6300, -4, 0), (6.2396, -21, 7200, -9, -8),
                   (6.2496, -22, 1850, -4.5, -17.5), (6.2576, -30, 1900, -1, 2),
                   (6.302, -33.5, 4570, 5, 1.5), (6.3305, -32, 4960, 3, 5.5),
                   (6.3775, -34.5, 6000, 0.5, 15), (6.394, -40, 8100, -22, 11),
                   (6.455, -31.5, 3000, -35, 0), (6.4906, -42.5, 4300, 8, 7), (6.521, -35, 5040, -31, 2.5),
                   (6.6173, -27.5, 5000, -11, 1.5), (6.6723, -31.5, 3500, -7, 6.5),
                   (6.731, -25, 4900, -2, 7.5), (6.8485, -39.5, 2860, -6.5, -0.5),
                   (6.9414, -34.5, 5600, -6.5, 9), (7.041, -45.5, 5500, -16, 7.5), (7.136, -38, 2750, 3, 1),
                   (7.3998, -34, 5230, -9, -3), (7.4901, -35, 5270, -32, -7), (7.6159, -39, 3680, -10, 1),
                   (9.06, -46.5, 4040, -7, 0)]
    near = snaps(big_creases) + snaps(ribs(), RIB_FLUTTER_S) + snaps(strays())
    near = near + rustle() + knocks() + rumbles()
    return (near + room(near) + hiss() + moan())[None]


def record(dry):
    """The microphone rounds the highest peaks and the top is cut."""
    rounded = dry / (1 + dry ** 6) ** (1 / 6)
    return signal.sosfilt(signal.ellip(10, .2, 80, TOP_HZ, fs=SR, output="sos"), rounded)


dry = scene()
out = record(dry)
output_pcm(out)
```